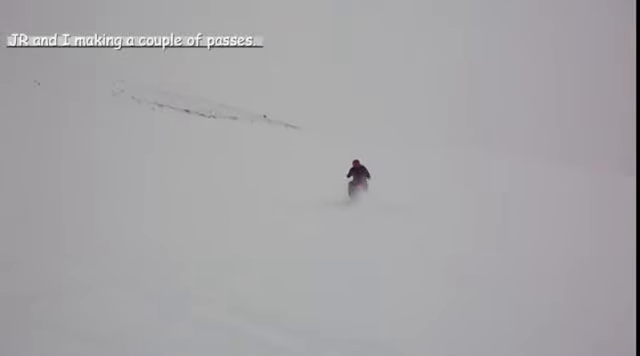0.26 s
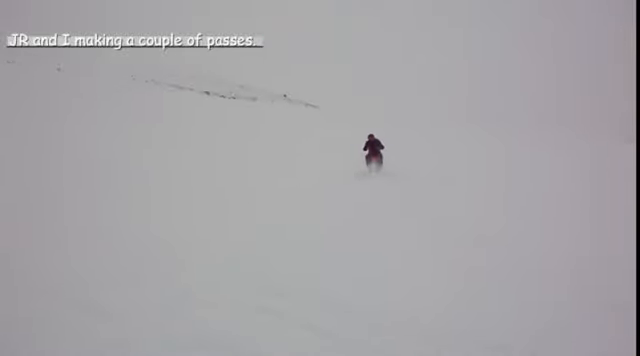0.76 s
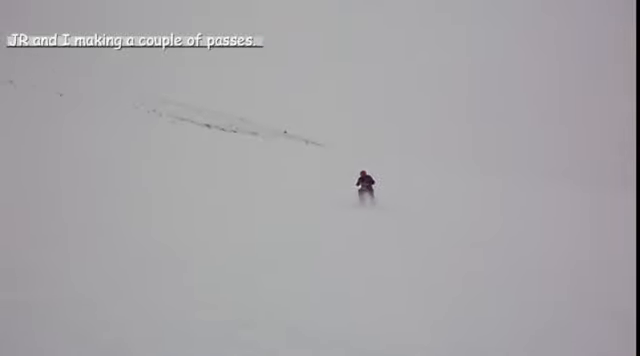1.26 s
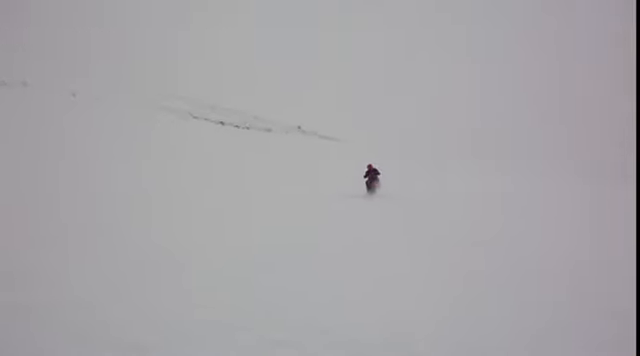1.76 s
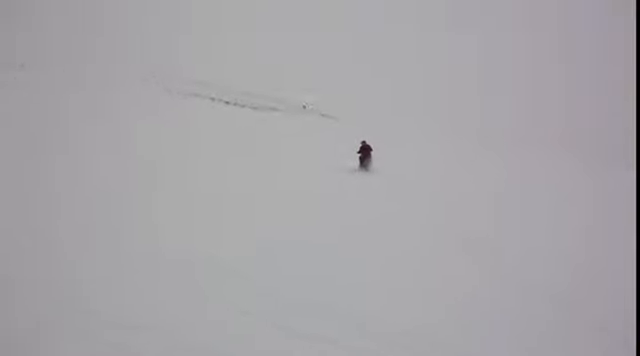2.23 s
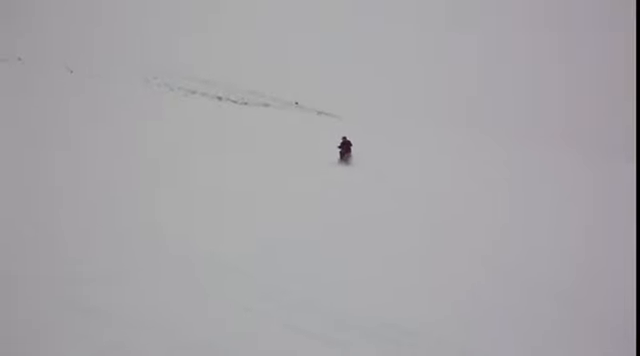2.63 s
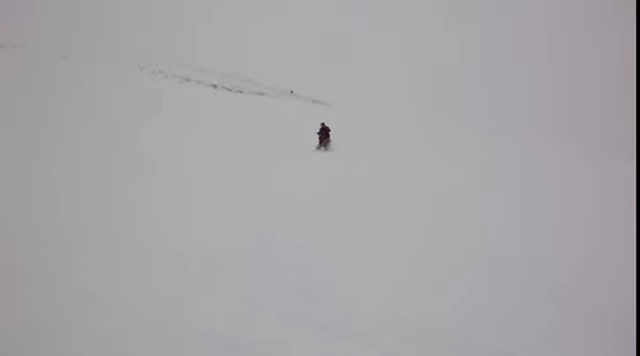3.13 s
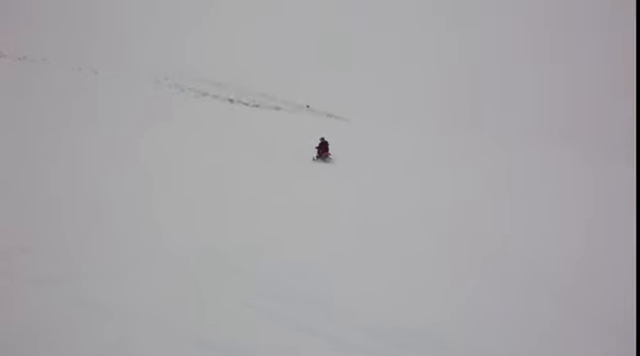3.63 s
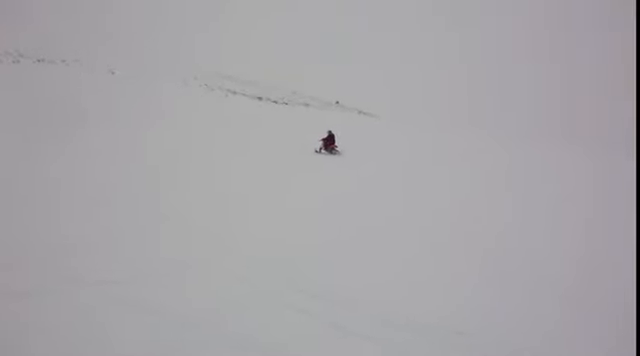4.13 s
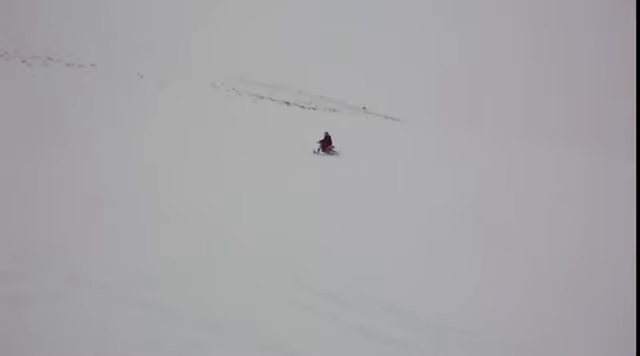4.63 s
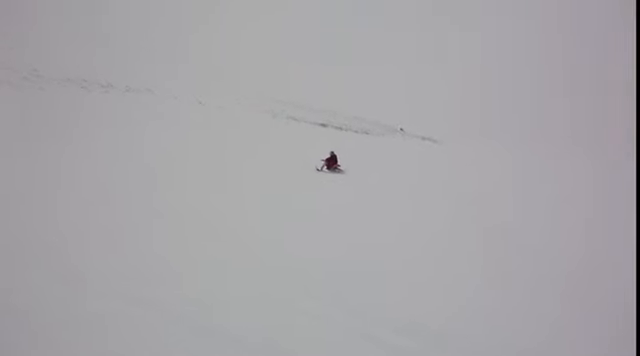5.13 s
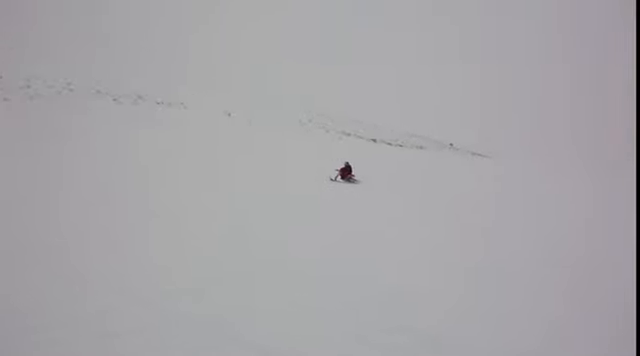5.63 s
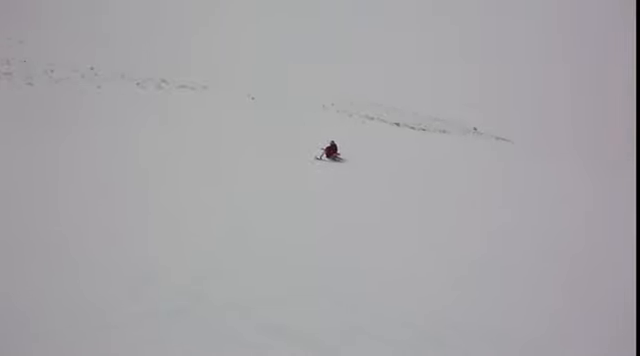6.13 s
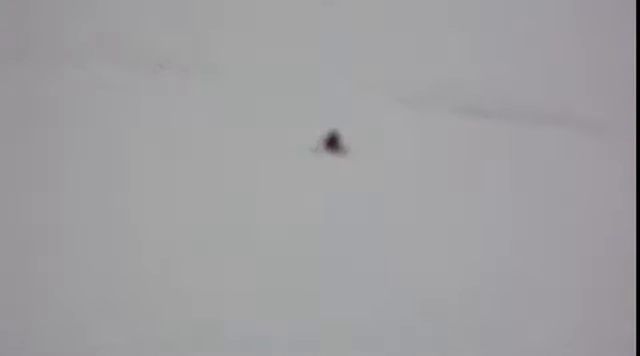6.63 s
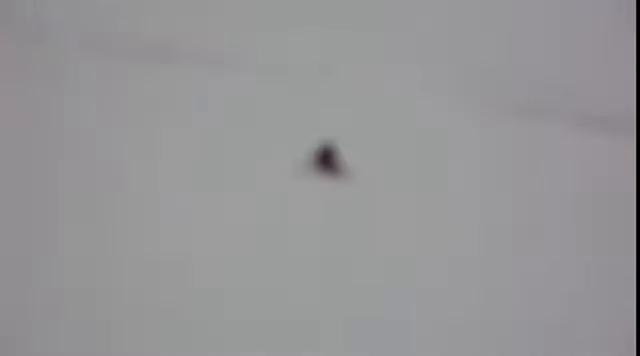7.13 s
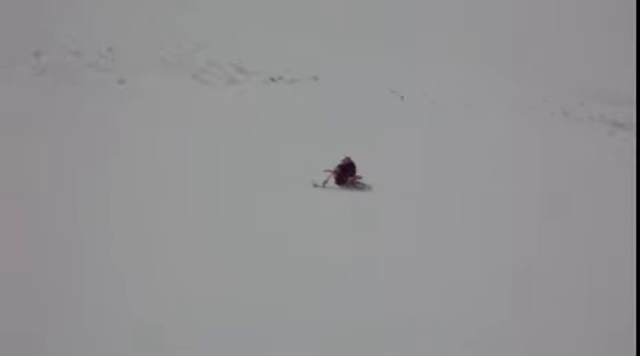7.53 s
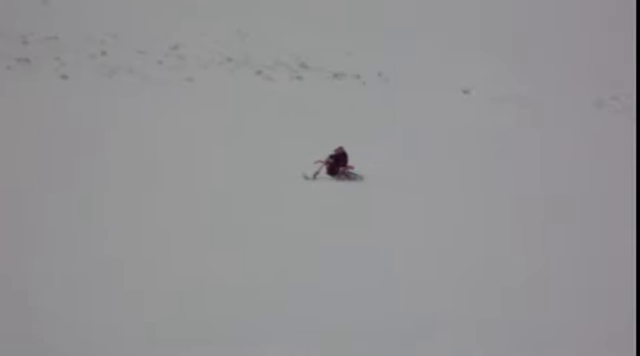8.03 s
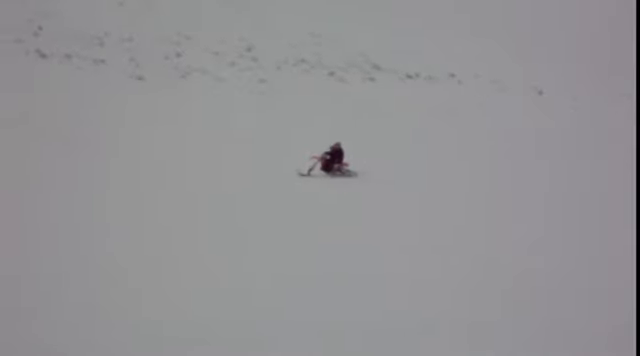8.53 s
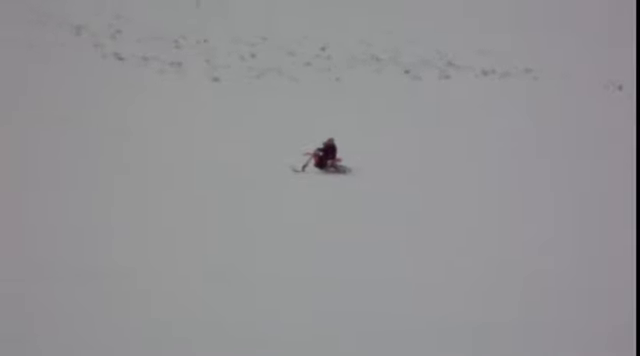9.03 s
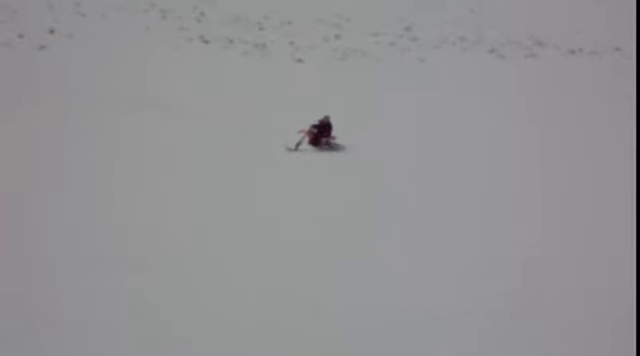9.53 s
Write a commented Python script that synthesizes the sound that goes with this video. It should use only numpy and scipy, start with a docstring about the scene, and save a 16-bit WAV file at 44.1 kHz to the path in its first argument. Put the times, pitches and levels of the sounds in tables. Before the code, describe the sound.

Distant raspy bike engine stutters off throttle, surges, and later climbs in pitch, with wind bumps, hiss, lens clicks and a one-second motor buzz.

```python
"""A single-cylinder snow bike rides off across a snowfield, popping on a shut throttle, then turns and pulls harder.
Cracks of pressure pass through echoes and filters to make the exhaust; bands of grainy noise make chain and track rattle.
The camera's zoom lever and lens click (ringing tones) and its stepper motor buzzes for a second (ticks and sines);
gloves rub the camera (noise strokes), and the microphone gain steps up and down.
Wind bumps the microphone (pulses and rumbling noise) over hiss and a low sine hum that swells and fades."""
import sys
import numpy as np
from scipy import signal
from scipy.fft import rfft, irfft
from scipy.io import wavfile

SR = 44100
rng = np.random.default_rng(int(sys.argv[2]) if len(sys.argv) > 2 else 0)


def waveform_to_disk(signal):
    """Save audio, clipped to [-1, 1], as 16-bit WAV at the path in sys.argv[1]."""
    frames = np.transpose(np.atleast_2d(signal))
    scaled = np.clip(frames, -1, 1) * 32767
    samples = np.round(scaled).astype(np.int16)
    wavfile.write(sys.argv[1], SR, samples)


N = 430857
T = np.arange(N) / SR  # the time of every sample, in seconds

# The rider's hand. Each row: time in seconds, exhaust level in dB before the microphone gain, throttle (0-1).
RIDE = [(0, -41, 0), (.9, -42, 0), (1.33, -52, 0.9), (1.45, -45.5, 0.6), (1.72, -39.5, 0.3),
        (2.03, -39, 0.1), (2.15, -55, 0.3), (2.65, -41.5, 0.3), (2.9, -52, 0.5), (3.1, -47, 0.06),
        (3.55, -47.5, 0.2), (3.62, -45, 0.3), (3.85, -44.5, 0.27), (4.11, -32, 0.94), (4.3, -33, 1),
        (4.45, -40, 0.44), (4.68, -43, 0.56), (5.0, -39.5, 0.4), (6.06, -40.5, 0.33), (6.22, -36, 0.12),
        (7.95, -38, 0.2), (8.8, -31.5, 0), (9.1, -31.5, 0.57), (9.22, -37.5, 0), (9.5, -33.5, 0.63),
        (9.77, -33, 0.3)]
# Which way the bike points. Each row: time in seconds, heading (0 seen from behind, 1 from the side, 2 climbing).
HEADING = [(0, 0.11), (2.0, 0.62), (2.9, 0.75), (3.5, 0.94), (5.0, 0.95), (6.1, 1.19), (7.5, 2),
           (9.77, 1.68)]
# Steps of the microphone gain. Each row: time in seconds, gain in dB.
MIC_GAIN = [(0, 0), (6.19, 0), (6.2, 7), (7.563, 7), (7.567, 16), (9.11, 16), (9.112, 7), (9.77, 7)]


def amp(db):
    """Turns decibels into a gain."""
    return 10 ** (np.asarray(db) / 20)


def evened(x):
    """Scales a sound to an rms level of 1."""
    return x / np.sqrt(np.mean(x ** 2) + 1e-20)


def curve(rows, axis=1):
    """Draws straight lines between the rows of one table column, for every sample."""
    rows = np.asarray(rows, float)
    return np.interp(T, rows[:, 0], rows[:, axis])


def add(mix, s, sound):
    """Mixes a sound in, starting at s seconds."""
    part = mix[max(0, round(s * SR)):][:len(sound)]
    part += sound[:len(part)]


def drift(hz):
    """Makes a random wander of rms 1 that moves no faster than about hz."""
    size = 2 ** 19
    spectrum = rfft(rng.standard_normal(size))
    slowing = 1 + (np.fft.rfftfreq(size, 1 / SR) / hz) ** 4
    return evened(irfft(spectrum / slowing)[:N])


def highpass(x, hz):
    """Takes away the sound below hz."""
    return signal.sosfilt(signal.butter(2, hz, "high", fs=SR, output="sos"), x)


def colour(x, points, size=4096):
    """Gives a sound the tone colour of a table, with a filter of energy 1 that never acts early."""
    hz, db = np.transpose(points)
    log_hz = np.log(abs(np.fft.fftfreq(size, 1 / SR)) + 1)
    log_gain = np.log(amp(np.interp(log_hz, np.log(hz), np.maximum(db, -90))))
    # this phase puts the filter's energy as early as possible
    taps = np.fft.ifft(np.exp(np.conj(signal.hilbert(log_gain)))).real[:size // 2]
    return signal.oaconvolve(x, taps / np.linalg.norm(taps))[:len(x)]


def pulses(times, sizes, size=8):
    """Makes sharp impulses that may fall between two samples."""
    at = (times * SR).astype(int)[:, None] + np.arange(-size, size + 1)
    off, out = at - times[:, None] * SR, np.zeros(N)
    shape = np.sinc(off) * np.sinc(off / (size + 1))
    np.add.at(out, at.clip(0, N - 1), sizes[:, None] * shape)
    return out


def puffs(train, decay):
    """Follows each impulse with a dying burst of noise of the same energy; decay in seconds."""
    r = np.exp(-1 / (decay * SR))
    power = signal.lfilter([1 - r], [1, -r], train ** 2 + 1e-18)
    return np.sqrt(power) * rng.standard_normal(N)


def scatter(train, decay, turn_hz, count=3, size=1400):
    """Smears impulses into close reflections by blending random echo patterns that take turns."""
    t, out = np.arange(size) / SR, np.zeros(N)
    turn = turn_hz * T + rng.random()
    for k in range(count):
        taps = rng.standard_normal(size) * np.exp(-t / decay) * (t > .0006)
        echoes = signal.oaconvolve(train, taps / np.linalg.norm(taps))[:N]
        out += np.cos(np.pi * (turn + k / count)) * echoes
    return out * np.sqrt(2 / count)


def throttle():
    """Tells how far the throttle is open, 0-1."""
    return np.clip(curve(RIDE, axis=2), 0, 1)


def aspect(axis):
    """Follows one effect of the heading as the bike turns."""
    # Each row: heading, share of the sound scattered (0-1), silencer boom in dB, treble tilt in dB.
    by_heading = np.asarray([(0, 0.77, -5, 0.5), (.5, 0.59, 7.5, -1.2), (1, 0.43, -3, -0.04),
                             (1.4, .55, 0.5, -3), (2, 0.63, 3.5, -1.1)], float)
    return np.interp(curve(HEADING), by_heading[:, 0], by_heading[:, axis])


def firings(uneven_db=3.0, steadied=.8, jitter_s=.00001, pop_s=0.0054, waver=0.003067):
    """One pressure crack per cycle, evener on an open throttle; in a stutter, weak cycles lead up to each pair of pops."""
    # Engine speed before a slight waver. Each row: time in seconds, firings per second.
    speed = [(0.0, 80.9), (0.45, 74.1), (0.59, 82.3), (1.05, 86.7), (1.37, 59.0), (1.77, 87.3),
             (2.01, 89.3), (2.26, 64.3), (2.48, 69.9), (2.71, 72.7), (3.05, 63.6), (3.32, 63.7),
             (3.88, 68.6), (4.16, 95.9), (4.36, 96.7), (4.47, 81.7), (4.65, 77.1), (4.98, 86.8),
             (5.32, 83.5), (5.64, 83.0), (5.95, 87.7), (6.04, 84.8), (6.16, 94.2), (6.6, 90.4),
             (7.16, 90.5), (7.49, 83.9), (7.99, 83.4), (8.17, 85.4), (8.45, 92.2), (8.81, 93.5),
             (8.89, 90.8), (9.19, 102.7), (9.27, 97.9), (9.41, 98.7), (9.53, 112.4), (9.77, 114.5)]
    # Misfiring: weak cycles, then two hard firings; the pairs repeat evenly.
    # Each row: first pair in seconds, last pair in seconds, number of pairs, level of the first pop in dB.
    stutters = [(.0129, .0763, 2, -30), (.1395, .3335, 4, -33), (.4587, .5231, 2, -34),
                (.5962, .7038, 2, -32.5), (.763, .8598, 3, -31.5), (.8952, .943, 2, -34.5),
                (1.001, 1.0713, 2, -33), (1.1085, 1.1848, 2, -35), (1.2426, 1.3376, 2, -38),
                (2.0705, 2.1652, 2, -37), (2.237, 2.3269, 2, -38), (2.419, 2.5912, 4, -36.5),
                (2.6602, 2.8153, 3, -38), (2.8751, 2.97, 3, -38.5), (3.3091, 3.3561, 2, -39),
                (3.4014, 3.5419, 4, -35.5), (7.7085, 7.7921, 2, -29), (8.424, 8.424, 1, -30),
                (8.856, 8.965, 3, -29)]
    second_pop_db, misfire_db, weak_cycles = -0.5, -16, 2.2

    hz = curve(speed) * (1 + waver * drift(7.19))
    turns = np.cumsum(hz) / SR
    times = np.interp(np.arange(1, turns[-1]), turns, T)  # a firing at each whole count
    chance = rng.standard_normal((len(times), 2))
    spread_db = uneven_db * (1 - steadied * np.interp(times, T, throttle()))
    level = amp(curve(RIDE)) * np.sqrt(SR / hz)  # keeps the loudness apart from the speed
    sizes = np.interp(times, T, level) * amp(spread_db * chance[:, 0])

    rows = [(s, db) for first, last, count, db in stutters for s in np.linspace(first, last, round(count))]
    pairs, pair_db = np.transpose(rows)
    cycle = 1 / np.interp(pairs, T, hz)
    cycles_after = (times[:, None] - pairs) / cycle
    weak = ((cycles_after > -weak_cycles) & (cycles_after < 0)).any(1)
    sizes *= amp(misfire_db * weak)
    sizes *= (abs(cycles_after - .5) > 1).all(1)  # the pops take the place of two firings
    pop_sizes = amp(np.r_[pair_db, pair_db + second_pop_db]) * np.sqrt(pop_s * SR)
    steady = -pulses(times + jitter_s * chance[:, 1], sizes)
    return steady, -pulses(np.r_[pairs, pairs + cycle], pop_sizes)


def exhaust(pop_gas_db=-9, echo_s=0.001527, echo=0.32, sway=0.049, gas_db=-13, shut_clatter=0.9,
            low_clatter_db=-8, scatter_s=0.007, pop_crack=0.96, pop_scatter=0.76):
    """Cracks with their echoes and rushing gas; while coasting the engine's clatter takes over from the firings."""
    shut_clatter_share = 0.66  # share of the firings' power that is given up on a shut throttle
    open_direct_share = 0.52  # full throttle cuts the scattered share by this fraction
    open_clatter, clatter_grain_db = .13, 2

    steady, pops = firings()
    coast = np.clip(shut_clatter_share * (1 - throttle()) ** 2, 0, 1)
    wet = np.clip(aspect(axis=1) * (1 - open_direct_share * throttle() ** 3), 0, 1)
    steady = steady * np.sqrt(1 - coast)

    train = steady + pop_crack * pops
    # one trip down the pipe and back
    bounce = np.interp(T - echo_s * (1 + sway * drift(0.82)), T, train)
    direct = train + echo * bounce
    # close reflections off frame and snow change as the bike moves
    reflected = scatter(steady + pop_scatter * pops, decay=scatter_s, turn_hz=2.2)
    cracks = np.sqrt(1 - wet) * direct + np.sqrt(wet) * reflected

    gas = amp(gas_db) * puffs(steady, decay=.004)
    clatter_level = amp(curve(RIDE) + clatter_grain_db * drift(150)) * (open_clatter + shut_clatter * coast)
    clatter = clatter_level * rng.standard_normal(N)
    rush = highpass(gas + clatter, 2200)  # the low harmonics stay clean
    rush += amp(low_clatter_db) * clatter
    return cracks + rush + amp(pop_gas_db) * puffs(pops, decay=0.0012)


def engine(boom_hz=680, boom_q=4, boom_db=-4, treble_hz=2500, engine_db=0.24):
    """The exhaust is coloured by the way the pipe points and by the throttle."""
    # Exhaust colour from behind, from the side, and climbing under load.
    # Each row: frequency in Hz, relative level in dB per Hz.
    behind = [(220, -41), (380, -28), (425, -9), (469, -11.5), (596, 0), (686, -3.5), (802, -3.5),
              (1240, 2), (1370, -10.5), (1510, 4), (2090, -5.5), (3720, 1), (4730, -16.5), (7110, -30),
              (11000, -37), (14300, -65), (22000, -120)]
    abeam = [(250, -33), (420, -25), (516, -18.5), (659, -8.5), (953, -27), (1130, -12.5), (1240, 0.5),
             (1400, -6.5), (1860, 0), (2220, -5.5), (2650, 3.5), (2980, -3), (3300, -.5), (3950, -10),
             (4720, -21.5), (11000, -44), (14300, -74), (22000, -120)]
    climbing = [(190, -67.5), (330, -26), (510, -19), (743, -8.5), (813, -15.5), (1130, -9), (1400, -4),
                (1680, 2), (1850, -3.5), (2160, 2.5), (2590, -1.5), (3500, 2.5), (4050, 0.5), (4800, -13),
                (6010, -22.5), (6980, -36), (8120, -26), (12000, -50.5), (15600, -77), (22000, -120)]
    # the pipe's ring is damped by the rush of gas as the throttle opens
    ring_hz, ring_q, shut_ring_db, open_ring_db = 1240, 1.7, 2.5, -4
    shut_bright_db, open_bright_db = 1.4, 2.5  # treble tilt by throttle; the heading adds its own

    drive, heading, load = exhaust(), curve(HEADING), throttle() ** 2
    pipe = np.zeros(N)
    for k, view in enumerate((behind, abeam, climbing)):
        nearness = np.maximum(1 - abs(heading - k), 0)
        pipe += nearness * colour(drive, view)
    silencer = signal.lfilter(*signal.iirpeak(boom_hz, boom_q, SR), pipe)
    ring = signal.lfilter(*signal.iirpeak(ring_hz, ring_q, SR), pipe)
    pipe += (amp(boom_db / 2 + aspect(axis=2)) - 1) * silencer  # booms most between behind and the side
    pipe += (amp(shut_ring_db + (open_ring_db - shut_ring_db) * load) - 1) * ring

    low = signal.sosfiltfilt(signal.butter(2, treble_hz, fs=SR, output="sos"), pipe)
    bright_db = shut_bright_db + (open_bright_db - shut_bright_db) * load + aspect(axis=3)
    return amp(engine_db) * (low * amp(-bright_db) + (pipe - low) * amp(bright_db))


def track(grain_db=2):
    """Chain and track rattle as grainy noise, mostly in a narrow band of treble."""
    # Each row: time in seconds, level in dB before the microphone gain.
    rattle_level = [(0, -49), (1.1, -53.5), (1.6, -42), (2.2, -53.5), (2.6, -49), (3.2, -53.5),
                    (6.1, -49.5), (7.6, -40.5), (9.77, -41)]
    # Each row: frequency in Hz, relative level in dB per Hz.
    rattle_colour = [(200, -48), (1000, -15.5), (2500, -6), (3300, 2), (3700, 2.5), (4150, 0.5),
                     (4700, -15.5), (6500, -26.5), (8200, -23), (16000, -49)]
    grains = evened(rng.standard_normal(N) * amp(grain_db * drift(140)))
    return amp(curve(rattle_level)) * colour(grains, rattle_colour)


def zoom_motor(tooth_db=1.5, rasp_db=-4, step_db=-3, play_s=.00005, drone_hz=160, drone_db=-47):
    """Gear teeth tick nine times a turn, harder twice a turn; the motor's steps add rasp and a thin whine."""
    # Level of the gear rattle. Each row: time in seconds, level in dB.
    running_level = [(6.355, -57), (6.39, -25.5), (7.43, -26.5), (7.445, -70)]
    # Colour of the rattle through the lens. Each row: frequency in Hz, relative level in dB per Hz.
    lens_colour = [(590, -21), (1000, -21.5), (1210, -12.5), (1810, -8), (1970, -16), (2580, -6),
                   (2800, -9), (4030, -0.5), (4470, -4), (5740, -12.5), (6770, -21), (7840, -16),
                   (8780, -31), (10300, -36), (12000, -42), (15600, -65), (22000, -120)]
    # Each row: multiple of the step rate, level in dB before the whine's trim and flutter.
    whine_tones = [(1, -43.5), (2, -45), (3, -48.5), (4, -39), (6, -37.5), (8, -61), (16, -61), (18, -50),
                   (20, -39.5), (24, -60), (26, -54), (28, -63), (34, -54.5), (36, -56)]
    step_hz, gear_hz, whine_trim_db = 293.05, 29.3, -4.5
    tooth_spread_db, tooth_echo_s = 2, .00045

    start, end = running_level[0][0], running_level[-1][0]
    teeth = np.arange(start, end, 1 / (9 * gear_hz))
    steps = np.arange(start, end, 1 / (2 * step_hz))
    turn = 2 * np.pi * gear_hz * (teeth - 6.47)
    tooth_level_db = 2.6 * np.cos(turn) + 3.6 * np.cos(2 * turn)
    tooth_level_db += tooth_spread_db * rng.uniform(-1, 1, len(teeth))
    ticks = pulses(teeth + play_s * rng.standard_normal(len(teeth)), amp(tooth_level_db))
    ticks *= np.sqrt((end - start) * SR / np.sum(ticks ** 2))  # rms 1 while running
    stepping = pulses(steps, np.full(len(steps), np.sqrt(SR / step_hz / 2)))

    rattle = amp(tooth_db) * (ticks + 0.62 * scatter(ticks, decay=tooth_echo_s, turn_hz=2)) / 2
    rattle += amp(rasp_db) * puffs(ticks, decay=0.00041)
    rattle += amp(step_db) * puffs(stepping, decay=0.00018)
    rattle *= amp(1.8 * np.cos(2 * np.pi * gear_hz * (T - 6.47)))  # swells once a turn

    whine = np.zeros(N)
    for k, db in whine_tones:
        tone = np.sin(2 * np.pi * (round(k) * step_hz * T + rng.random()))
        whine += amp(db + drift(22)) * np.sqrt(2) * tone
    whine += amp(drone_db + drift(22)) * np.sqrt(2) * np.sin(2 * np.pi * drone_hz * T)  # a low drone
    running = (T > start) & (T < end)
    return running * (amp(curve(running_level)) * colour(rattle, lens_colour) + amp(whine_trim_db) * whine)


def clicks(size=1500, click_db=0):
    """Each click rings the camera's plastic case; a harder contact favours its high tones."""
    # A tap on the case, the zoom lever and the lens stops.
    # Each row: start in seconds, strength in dB, hardness in dB per octave.
    contacts = [(2.066, -21, 3), (6.1931, -14, 11), (6.208, -4.5, 1), (6.3402, 4.5, 1), (6.365, -9, 12),
                (6.538, -3.5, 9.5), (6.918, -3.5, 8.5), (7.4384, 2.5, 13.5), (7.478, 1, 1.5),
                (9.108, 1, 4.5)]
    # Ringing of the case. Each row: frequency in Hz, level in dB before the hardness, time to fall 60 dB in seconds.
    case_modes = [(1170, -33, 0.024), (1370, 17, 0.0063), (3010, 12.5, 0.0055), (3890, 5, 0.011),
                  (4314, 5.5, 0.0092), (5940, 2, 0.0021), (7720, -12.5, 0.0068), (9870, -21.5, 0.0075),
                  (13400, -45, 0.0036)]
    out, t = np.zeros(N), np.arange(size) / SR
    hz, mode_db, t60 = np.transpose(case_modes)[:, :, None]
    signs = (-1) ** np.arange(len(case_modes))[:, None]
    for s, db, hardness in contacts:
        weights = amp(mode_db + hardness * np.log2(hz / 2500)) * signs
        modes = weights * np.sin(2 * np.pi * hz * t) * amp(-60 * t / t60)
        ring = modes.sum(0) / np.linalg.norm(weights)
        # a sharp hit with a short rough tail
        contact = (t == 0) + .13 * rng.standard_normal(size) * np.exp(-t / .0016)
        add(out, s, amp(db + click_db) * np.convolve(ring, contact))
    return highpass(out, 750)  # a small case gives no bass


def handling():
    """Gloves rub and knock on the camera body in short grainy strokes of noise."""
    # Each row: start in seconds, length in seconds, peak level in dB before the grain.
    strokes = [(.212, 0.2, -50), (0.584, 0.015, -50), (0.66, 0.063, -45), (2.056, .015, -36),
               (3.862, 0.024, -45), (6.145, 0.0081, -33), (6.188, 0.017, -34), (6.878, 0.031, -25),
               (7.64, 0.222, -28), (7.84, 0.61, -37.5), (8.806, 0.37, -37), (9.622, 0.047, -33),
               (9.65, 0.079, -43.5)]
    # Each row: frequency in Hz, relative level in dB per Hz.
    stroke_colour = [(60, -5.5), (160, 1.5), (300, -7), (550, -13), (800, -21.5), (1150, -3.5), (2000, -33),
                     (5000, -40)]
    level = np.zeros(N)
    for s, length, db in strokes:
        arch = np.sqrt(np.maximum(1 - (2 * (T - s) / length - 1) ** 2, 0))
        level += amp(db) * arch
    return level * colour(rng.standard_normal(N) * amp(2.1 * drift(54)), stroke_colour)


def wind(lump_db=5.5):
    """Lumpy rumble, and single pushes of air on the microphone's diaphragm."""
    # Rumble. Each row: time in seconds, level in dB before lumps and trim.
    rumble_level = [(0, -40), (.7, -39.5), (1.6, -54.5), (2.0, -45.5), (2.6, -50.5), (5.1, -49.5),
                    (5.7, -42.5), (6.7, -34.5), (7.4, -42.5), (8.6, -43), (9.0, -35.5), (9.77, -44)]
    # Each row: frequency in Hz, relative level in dB per Hz.
    rumble_colour = [(12, -9), (25, 6), (45, 5.5), (85, -6), (120, -17), (165, -12), (220, -22),
                     (300, -27.5), (600, -45.5), (1500, -54)]
    # Single pushes. Each row: start in seconds, level in dB before the pulse shape, time scale of the push in seconds.
    buffets = [(0.564, -19, 0.0046), (.585, -21, 0.012), (0.646, -23, 0.0081), (0.698, -23, 0.0088),
               (1.067, -35, 0.0033), (1.295, -27, 0.0088), (2.064, -23, 0.0027), (2.372, -24, 0.0053),
               (3.856, -29.5, 0.015), (5.572, -26, 0.0077), (5.725, -20, 0.0075), (6.15, -17.5, 0.0063),
               (6.1936, -10, 0.0009), (6.878, -2.5, 0.0019), (6.895, -12, 0.0071)]
    level = amp(curve(rumble_level) + lump_db * drift(7.0) + 1.5)
    out = level * colour(rng.standard_normal(N), rumble_colour, size=16384)
    t = T[:SR // 4]
    for s, db, rise in buffets:
        u = t / rise
        add(out, s, -amp(db) * 1.63 * u * (2 - u) * np.exp(-u))  # a push, then a swing back
    return out


def hum(hz=57, waver_hz=5, fade_s=0.047):
    """A wavering low sine hum that comes on once a second and rises with the microphone gain."""
    first_s, every_s, length_s = -.19, 1.0, .58
    hum_db, gain_share = -46, 0.86  # level before gain and waver; share of the gain in dB that it follows
    since = (T - first_s) % every_s
    fade = np.clip(np.minimum(since, length_s - since) / fade_s, 0, 1)
    level = amp(hum_db + gain_share * curve(MIC_GAIN)) * fade
    phase = 2 * np.pi * np.cumsum(hz + waver_hz * drift(11.8)) / SR
    return level * amp(drift(6.7)) * np.sqrt(2) * np.sin(phase)


def hiss(hiss_db=-54.5):
    """Steady coloured noise lies under everything."""
    # Each row: frequency in Hz, relative level in dB per Hz.
    hiss_colour = [(30, 12.5), (90, 18), (125, 16.5), (164, 17), (205, 14), (300, 10), (500, 6),
                   (1500, 10.5), (6000, -9), (8000, -4.5), (10000, -5.5), (16000, -6.5)]
    return amp(hiss_db) * colour(rng.standard_normal(N), hiss_colour)


def scene():
    """The far bike and the hiss take the full microphone gain; the other sounds are at the camera."""
    far = engine() + track() + hiss()
    near = zoom_motor() + clicks() + handling() + wind() + hum()
    return (amp(curve(MIC_GAIN)) * far + near)[None]


def record(dry):
    """Flattens peaks beyond full scale, then takes away the highest treble."""
    edge_hz = 15900
    lowpass = signal.firwin(511, edge_hz, window=("kaiser", 9), fs=SR)
    return signal.oaconvolve(np.clip(dry, -1, 1), lowpass[None], "same")


dry = scene()
out = record(dry)
waveform_to_disk(out)
```